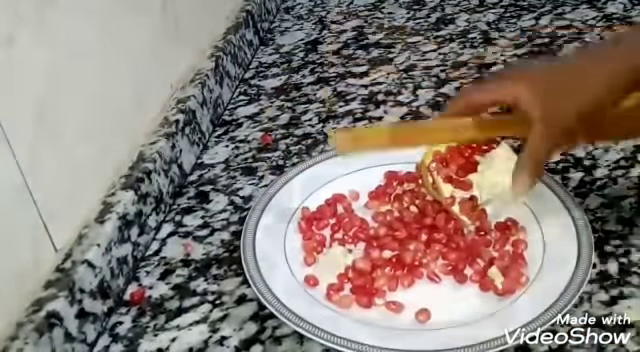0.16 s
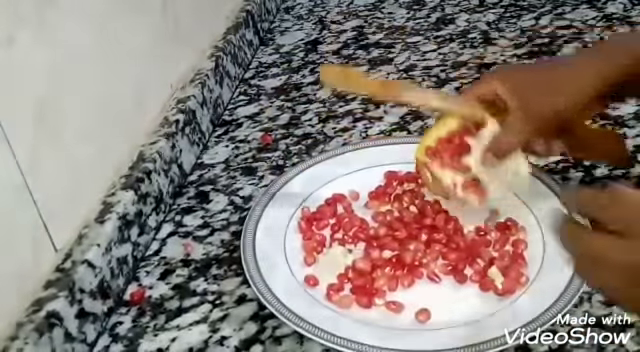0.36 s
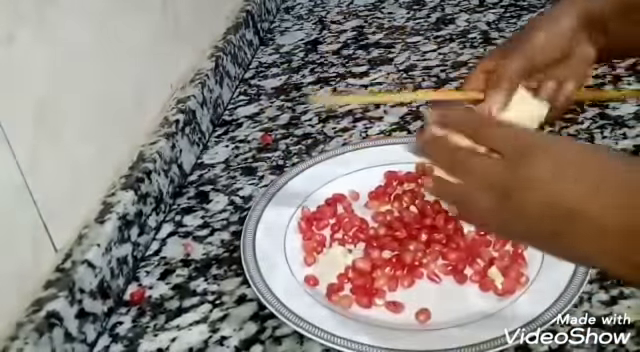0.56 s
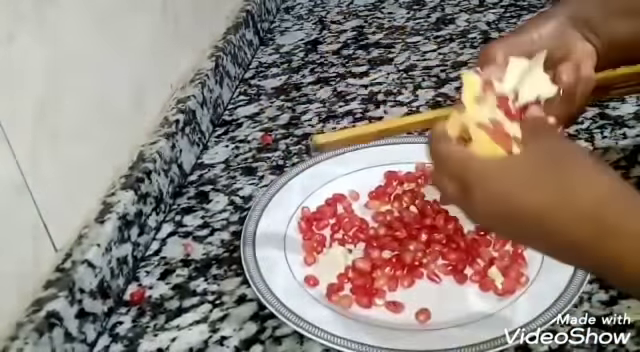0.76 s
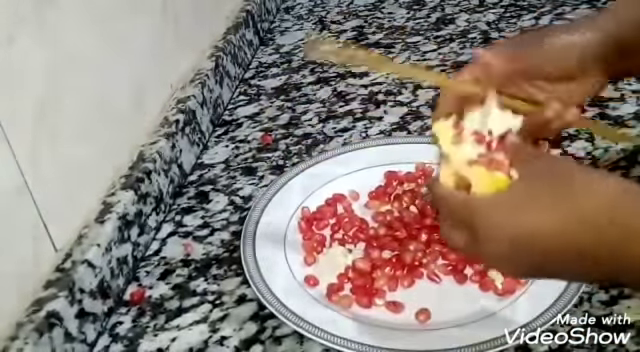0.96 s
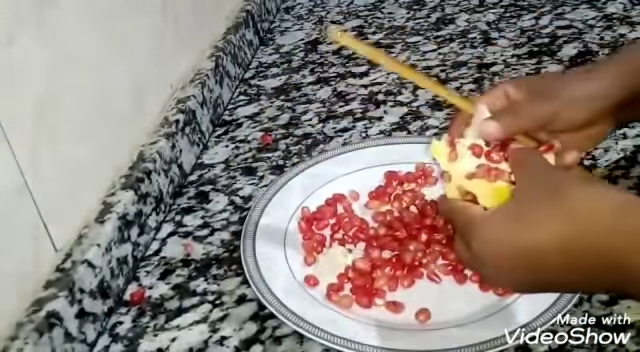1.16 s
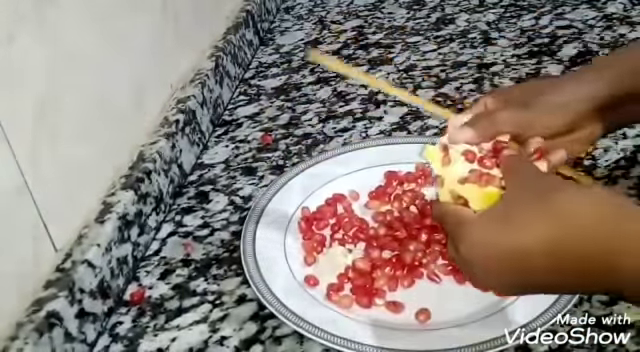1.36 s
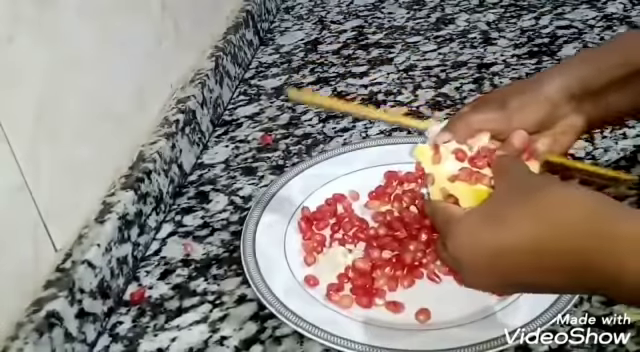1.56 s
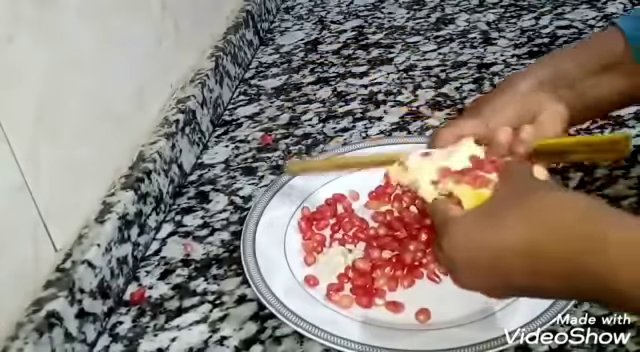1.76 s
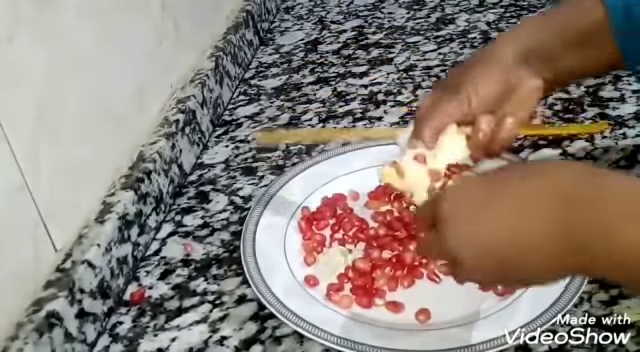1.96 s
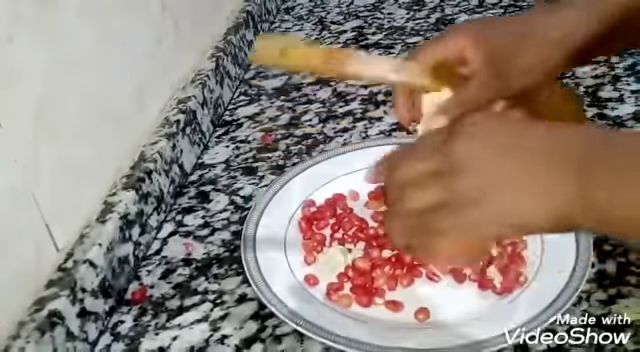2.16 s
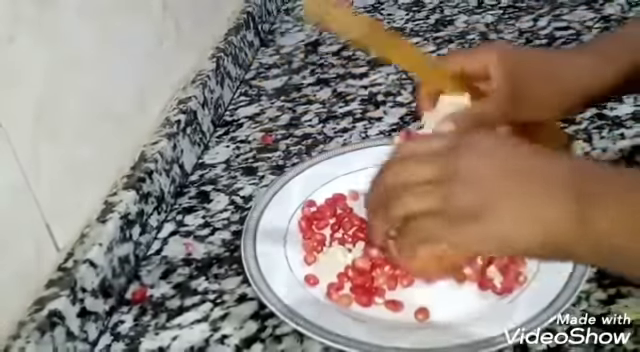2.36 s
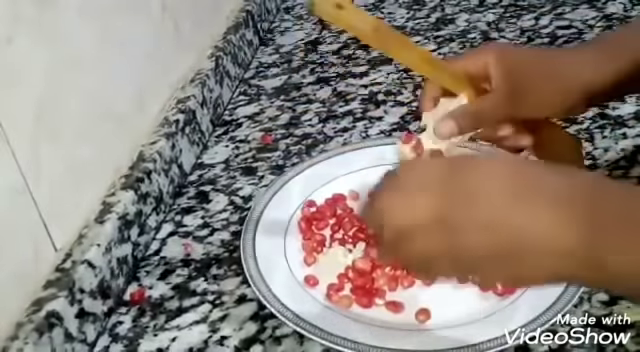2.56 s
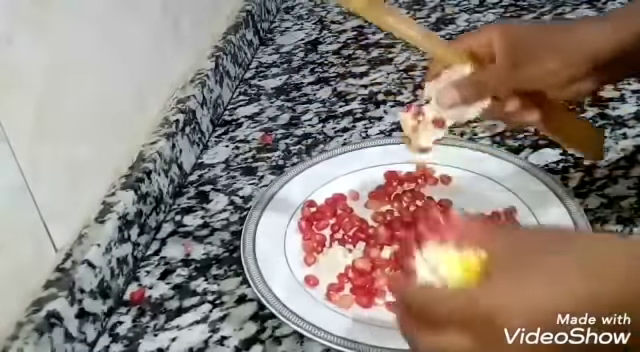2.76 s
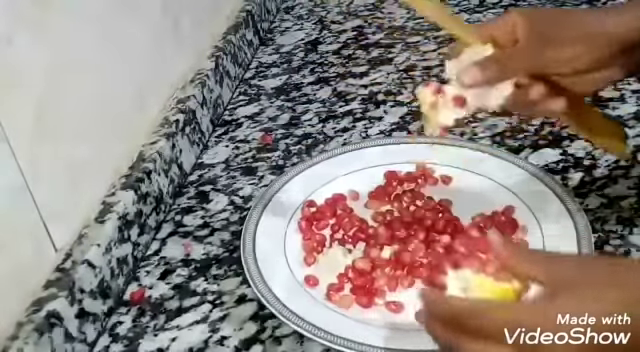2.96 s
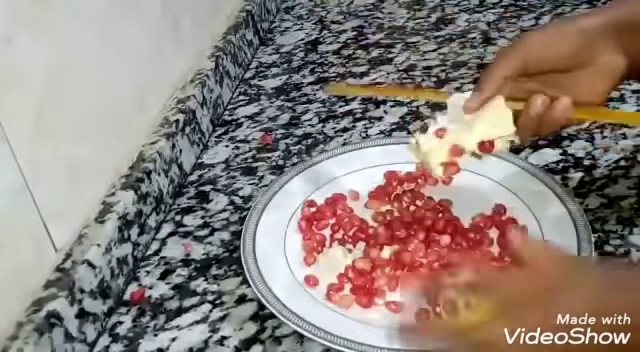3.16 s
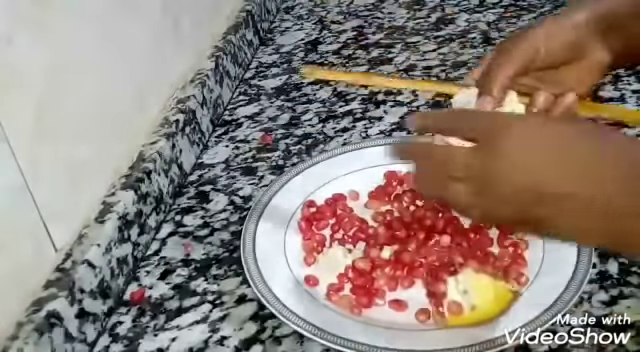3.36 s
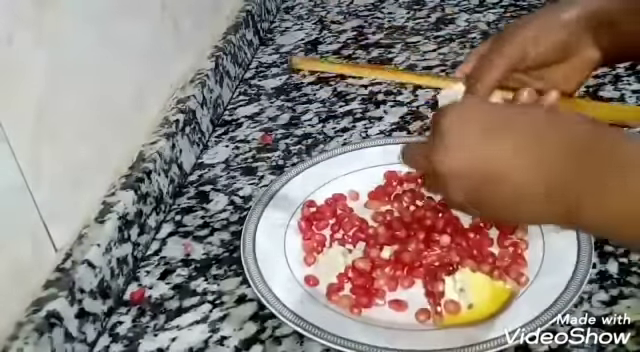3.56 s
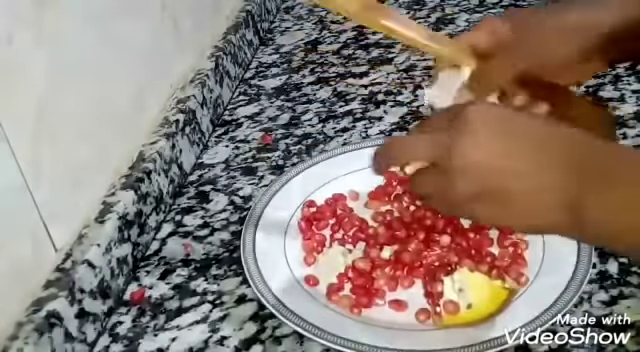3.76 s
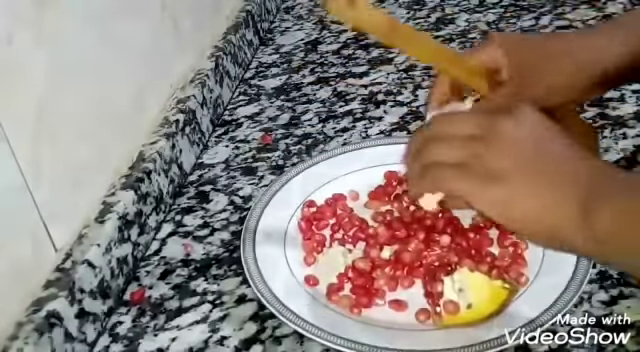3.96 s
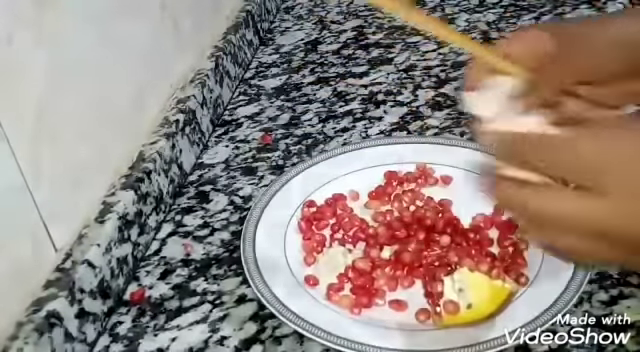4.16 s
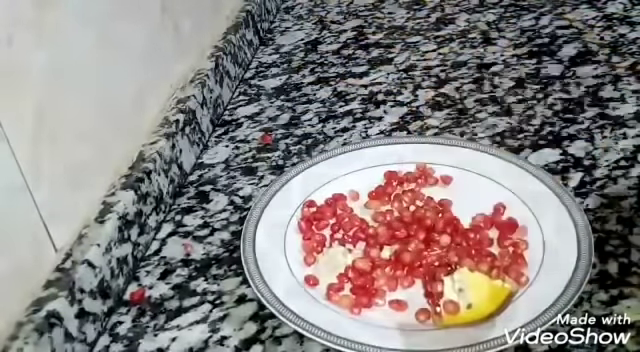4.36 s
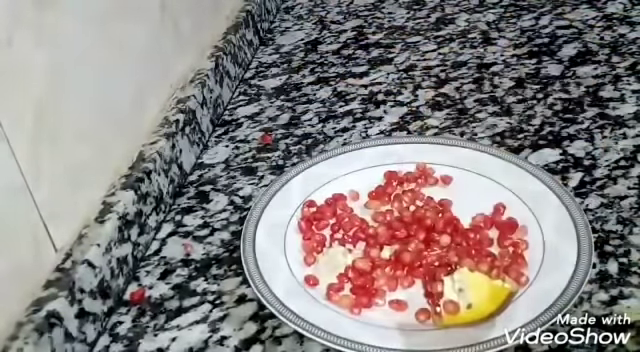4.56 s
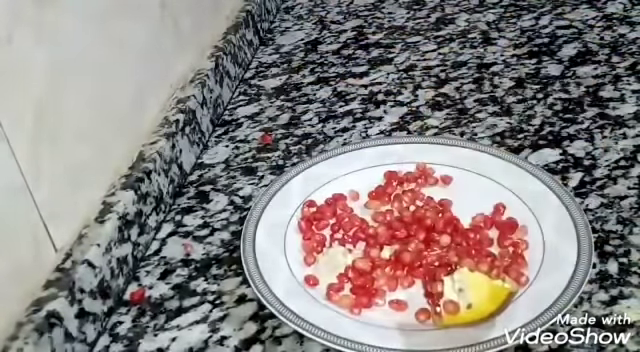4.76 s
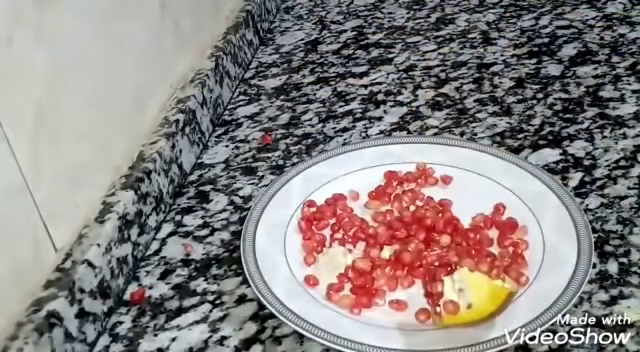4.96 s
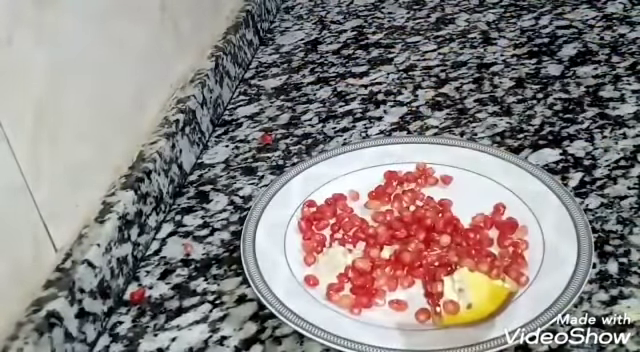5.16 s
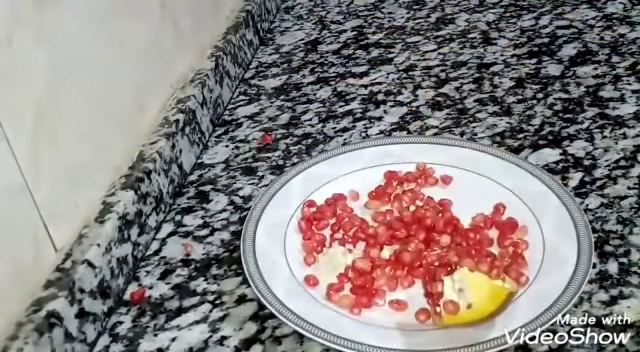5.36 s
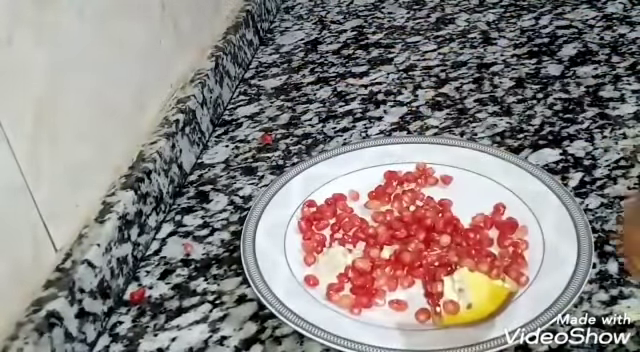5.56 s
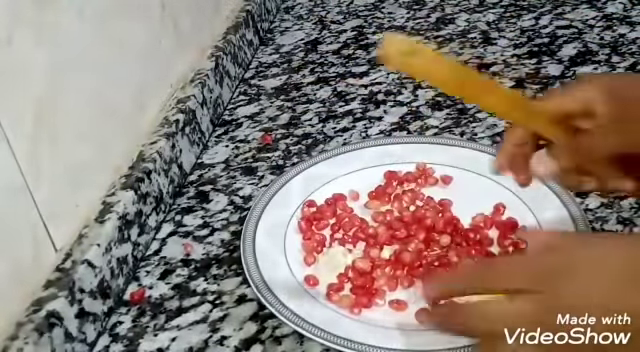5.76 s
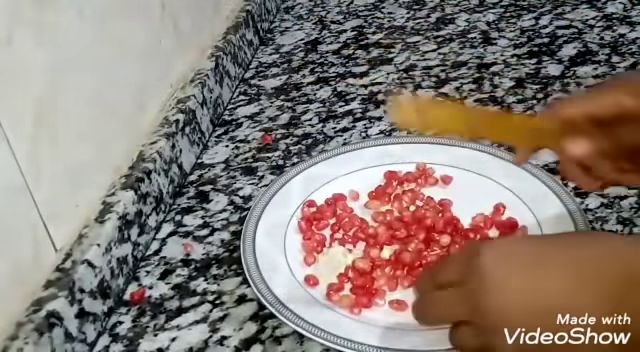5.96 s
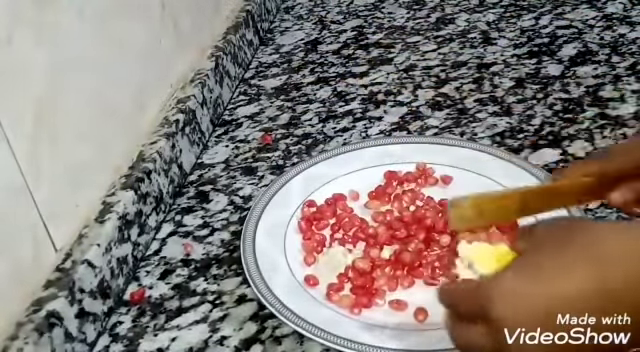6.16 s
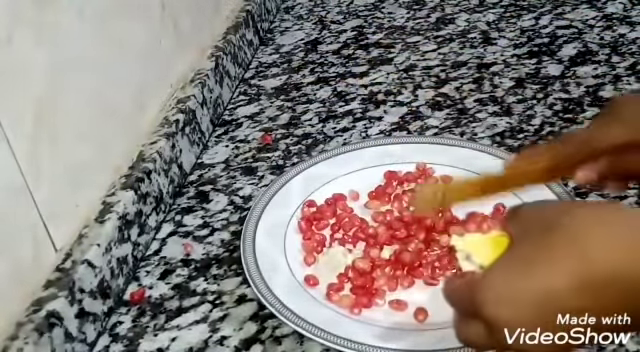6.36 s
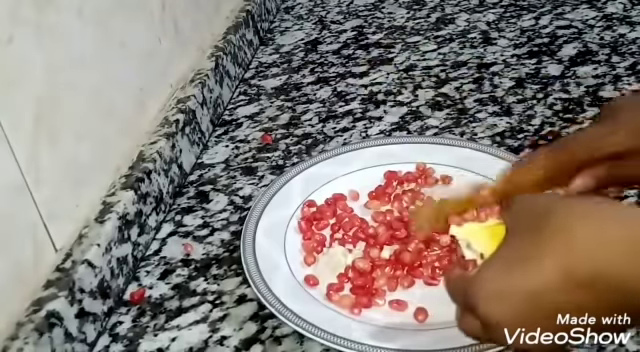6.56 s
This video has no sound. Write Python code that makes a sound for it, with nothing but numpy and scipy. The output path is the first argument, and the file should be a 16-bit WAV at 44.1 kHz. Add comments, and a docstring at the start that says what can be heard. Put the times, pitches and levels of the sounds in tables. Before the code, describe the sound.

Hands break up a pomegranate close to the microphone in a small kitchen with a short echo and a faint hiss. At about 0.3 seconds the rind cracks in a quick, crisp burst. A soft hollow tap follows at 0.6, and the fruit slides on a china plate with a faint creak. From 1.2 to 1.8 seconds the peel crackles and tears with tiny wet squishes, ending in a snap and a dull clunk from a wooden spoon. The spoon bumps and rubs lightly after 2 seconds, then knocks sharply on the plate near 2.5, making it ring briefly. A light tap and soft thuds come at 3.1, and two more snaps around 3.6. Then it is much quieter, with faint squishes and thuds near 4.9, light scraping around 5.8, and a last small crackle of rind at 6.5 seconds.

```python
"""Breaking up a pomegranate

Close to the microphone, hands break up a pomegranate over a china plate on a stone kitchen counter,
a wooden spoon held in one of them. The rind snaps and tears, wet pulp squishes, the spoon knocks and
sets the plate ringing, pieces thud down and slide, and fingers rub the peel. The small hard room
answers each sound over a quiet background with a narrow band of hiss."""
import sys
import numpy as np
from scipy import signal
from scipy.fft import rfft, irfft
from scipy.io import wavfile

SR = 44100
rng = np.random.default_rng(int(sys.argv[2]) if len(sys.argv) > 2 else 0)


def materialize(psi):
    """Save the field psi as 16-bit PCM at rate SR to the path in sys.argv[1].

    A 1-D psi becomes a single channel; in a 2-D psi each row is a channel.
    """
    bounded = np.clip(np.atleast_2d(psi).T, -1, 1)
    quanta = np.round(bounded * 32767).astype(np.int16)
    wavfile.write(sys.argv[1], SR, quanta)


N = 291833
TIME = np.arange(N) / SR

# Bending modes of the wooden spoon. Each row: pitch in Hz, level in dB, t60 in seconds.
SPOON_MODES = [(511, -14.5, 0.05), (592, -16, 0.035), (1392, -8.5, 0.033), (1673, 10, 0.021),
               (1976, -8, 0.025), (2706, -2.5, 0.06), (3870, -7, 0.015)]


def undb(db):
    """Decibels to gain."""
    return 10 ** (np.asarray(db) / 20)


def unit(x):
    """Scale to rms 1."""
    return x / np.sqrt(np.mean(x ** 2))


def add(track, s, sound):
    """Mix a sound into the track at s seconds."""
    i = int(s * SR)
    track[i:i + len(sound)] += sound[:N - i]


def convolve(x, response):
    """Filter x, keeping its length."""
    return signal.fftconvolve(x, response)[:len(x)]


def soften(x, bright_hz):
    """Low-pass: a softer contact passes less treble."""
    return signal.sosfilt(signal.butter(2, min(bright_hz, SR / 2 - 1), fs=SR, output="sos"), x)


def radiate(x, hz):
    """High-pass: a small object sends out almost no bass."""
    return signal.sosfilt(signal.butter(4, hz, "high", fs=SR, output="sos"), x)


def flutter(hz, size):
    """Random wavering up to the given rate, rms 1."""
    return unit(soften(rng.standard_normal(size), hz))


def swells(rows):
    """Smooth rises and falls of pressure from rows of middle in seconds, half-width in seconds, dB."""
    return sum(undb(db) * np.exp(-((TIME - s) / width) ** 2) for s, width, db in rows)


def impulse(points, size=2048):
    """Minimum-phase click with the given (Hz, dB) spectrum, peak 1."""
    hz, db = np.transpose(points)
    log_hz = np.log(np.fft.rfftfreq(size, 1 / SR) + 1)
    log_gain = np.log(undb(np.interp(log_hz, np.log(hz), db)))
    cepstrum = irfft(log_gain)
    cepstrum[1:size // 2] *= 2
    cepstrum[size // 2 + 1:] = 0
    click = irfft(np.exp(rfft(cepstrum)))
    return click / np.abs(click).max()


def ring(modes, size=22050):
    """Decaying sines of a struck object, from rows of Hz, dB, t60 in seconds."""
    t = np.arange(size) / SR
    hz, db, t60 = np.transpose(modes)[:, :, None]
    return np.sum(undb(db) * np.exp(-np.log(1000) * t / t60) * np.sin(2 * np.pi * hz * t), axis=0)


def pip(hz, rise_s, size):
    """A tone that swells smoothly and dies within a few rise times."""
    t = np.arange(size) / SR
    swell = (t / rise_s) ** 2 * np.exp(-t / rise_s)
    return swell / swell.max() * np.sin(2 * np.pi * hz * t)


def friction(colour, grains_per_s, spread_db):
    """Dense tiny slips of uneven size, rms 1."""
    slips = (rng.random(N) < grains_per_s / SR) * rng.choice([-1, 1], N)
    sizes = undb(spread_db * np.clip(rng.standard_normal(N), -2, 2))
    return unit(convolve(slips * sizes, impulse(colour)))


def background(floor_db=-74, swells_db=-83, hiss_db=-69, hiss_hz=1895, hiss_width_hz=150):
    """Low room tone with swells in its lower middle, and a narrow, wavering band of hiss."""
    # Steady room tone. Each row: frequency in Hz, relative density in dB.
    floor_colour = [(25, -27.5), (75, -4.5), (140, 0.5), (260, -0.5), (350, -13), (800, -7.5), (1250, -12),
                    (2400, -24), (3300, -19), (7000, -15), (9000, -29), (13500, -31), (15200, -23.5),
                    (16000, -26)]
    room_tone = unit(convolve(rng.standard_normal(N), impulse(floor_colour)))
    low_mids = unit(radiate(soften(soften(rng.standard_normal(N), 850), 850), 300))
    low_mids *= undb(4.5 * flutter(hz=4, size=N))
    band = signal.lfilter(*signal.iirpeak(hiss_hz, hiss_hz / hiss_width_hz, fs=SR),
                          rng.standard_normal(N))
    hiss = unit(signal.lfilter(*signal.iirpeak(hiss_hz, Q=3, fs=SR), band))
    waver = undb(1.5 * np.interp(TIME, np.linspace(0, TIME[-1], 70), rng.standard_normal(70)))
    return undb(floor_db) * room_tone + undb(swells_db) * low_mids + undb(hiss_db) * waver * hiss


def kitchen(x, low_t60=0.31, mid_t60=0.32, high_t60=0.26, build_s=0.00068, wall_s=0.028, size=16384):
    """Early reflections from counter and tiles melt into a short tail whose treble dies first."""
    t = np.arange(size) / SR
    walls = (rng.random(size) < 1 / 100) * rng.standard_normal(size) * 10
    echoes = rng.standard_normal(size) + undb(-3) * walls * np.exp(-t / wall_s)
    echoes *= 1 - np.exp(-t / build_s)
    low, below_top = (signal.sosfiltfilt(signal.butter(2, hz, fs=SR, output="sos"), echoes)
                      for hz in (1500, 7000))
    bands = ((low, low_t60), (below_top - low, mid_t60), (echoes - below_top, high_t60))
    response = sum(band * np.exp(-np.log(1000) * t / t60) for band, t60 in bands)
    return convolve(x, response / np.linalg.norm(response))


def scrape(touch_s=5.905, touch_db=-69):
    """Light, gritty friction in a few short pushes; one of them leaves a thin ring in the china."""
    # Faint scrapes on the plate. Each row: middle in seconds, half-width in seconds, level in dB.
    pushes = [(5.68, 0.049, -72.5), (5.76, 0.07, -73.5), (5.92, 0.014, -66), (5.98, .035, -97)]
    # Colour of the grit. Each row: frequency in Hz, level in dB.
    grit_colour = [(200, -24), (400, 4), (600, -8.5), (1200, -13.5), (2400, -2.5), (3000, -9), (3450, -2.5),
                   (4000, -12), (9000, -31.5)]
    out = swells(pushes) * friction(grit_colour, grains_per_s=920, spread_db=2.5)
    add(out, touch_s, undb(touch_db) * ring([(3530, 0.017, 0.29)]))
    return out


def rubs(fibre_db=-31, fibre_growth=.7):
    """Peel crackles under the fingers, single fibres give under the strain, and moving hands rustle."""
    # Fingers strain the peel. Each row: middle in seconds, half-width in seconds, level in dB.
    finger_rubs = [(.275, 0.04, -70), (.318, 0.0055, -38), (.354, 0.017, -39.5), (.8, 0.077, -71.5),
                   (1.187, 0.027, -62), (1.285, 0.048, -58), (1.542, 0.019, -55.5), (1.69, 0.021, -66),
                   (2.355, 0.015, -68.5), (3.09, 0.019, -59), (3.49, 0.032, -68), (3.595, 0.028, -58.5),
                   (4.905, 0.018, -69.5), (6.241, 0.032, -68), (6.589, 0.051, -59)]
    # Bright crackle of the peel. Each row: frequency in Hz, level in dB.
    peel_colour = [(200, -10), (700, -21), (2000, -2), (4000, -1), (6200, 7.5), (7500, 0.5), (9500, -15.5),
                   (15000, -32.5)]
    # The hands shift. Each row: middle in seconds, half-width in seconds, level in dB.
    hand_shifts = [(.32, 0.13, -68), (1.26, 0.025, -95), (2.78, .065, -70), (3.16, 0.052, -79.5),
                   (4.66, 0.074, -72.5), (4.92, 0.097, -66.5), (5.42, 0.1, -73), (5.74, 0.18, -73.5),
                   (6.27, 0.19, -73), (6.59, 0.017, -62.5)]
    # Dull rustle of the hands. Each row: frequency in Hz, level in dB.
    hand_colour = [(60, -14), (140, 11.5), (270, -2.5), (410, 7.5), (600, -10.5), (830, 1.5), (1200, -13.5),
                   (2400, -8.5), (3500, -22.5), (5000, -25.5), (12000, -55.5)]
    strain = swells(finger_rubs)
    peel = strain * friction(peel_colour, grains_per_s=2400, spread_db=4)
    fibres = strain ** fibre_growth * friction(peel_colour, grains_per_s=130, spread_db=1.5)
    hands = swells(hand_shifts) * friction(hand_colour, grains_per_s=700, spread_db=5)
    return peel + undb(fibre_db) * fibres + hands


def slide_pressure(ease_db_per_s, attack_s=0.014):
    """Each slide grips at once, holds, and eases off steadily."""
    # Fruit and hand slide over the plate. Each row: start in seconds, hold in seconds, level in dB.
    slides = [(0.586, 0.058, -59), (5.646, 0.12, -80.5)]
    pressure = np.zeros(N)
    for s, hold, db in slides:
        grip = np.clip((TIME - s) / attack_s, 0, 1)
        pressure += grip * undb(db - ease_db_per_s * np.maximum(TIME - s - hold, 0))
    return pressure


def drag(lift_s=.592, tap_db=-58, tick_db=-38, treble_hz=3200):
    """A hollow tap with a tick on top, and small slips that dull as the pressure eases."""
    # The hollow fruit as it lifts and slides. Each row: frequency in Hz, level in dB.
    hollow_colour = [(200, -29), (420, 6.5), (600, -20), (800, 4), (1050, -16), (1500, -21), (1850, 2),
                     (2300, 5), (2950, -7.5), (3250, -5.5), (3650, -8.5), (4100, 2.5), (4700, -22.5),
                     (9000, -39)]
    slips = friction(hollow_colour, grains_per_s=1200, spread_db=-4)
    out = soften(soften(slips, treble_hz), treble_hz) * slide_pressure(ease_db_per_s=34)
    out += radiate(slips, treble_hz) * slide_pressure(ease_db_per_s=100)
    tick = radiate(ring([(2110, 1, 0.027), (3140, 0.82, 0.0069)]), 2180)
    add(out, lift_s, undb(tap_db) * impulse(hollow_colour))
    add(out, lift_s, undb(tick_db) * soften(tick, treble_hz))
    return out


def groan(flutter_hz=130):
    """The fruit sticks and groans, rising in pitch as it lifts off the plate."""
    # Course of the groan. Each row: time in seconds, pitch in Hz, level in dB.
    course = [(0.643, 450, -91), (0.689, 594, -56.5), (0.719, 680.6, -59), (0.759, 818, -71),
              (.8, 809, -73), (0.852, 815, -67.5), (0.93, 736, -78.5), (1.02, 716, -100)]
    when, hz, db = np.transpose(course)
    phase = 2 * np.pi * np.cumsum(np.interp(TIME, when, hz)) / SR
    rough_tone = unit(flutter(flutter_hz, N) * np.sin(phase))
    return np.interp(TIME, when, undb(db), left=0, right=0) * rough_tone


def thuds(push_s=0.0031, t60=0.127, faint_db=-70, spread_db=5.5, low_hz=99, high_hz=513, size=22050):
    """Soft pushes, each ringing one low, damped resonance; fainter ones come at random."""
    # Fruit and hands land on the plate. Each row: start in seconds, level in dB, pitch in Hz.
    landings = [(0.292, -51, 121), (0.323, -60.5, 295), (0.405, -51.5, 130), (0.592, -43.5, 398),
                (0.599, -52, 126), (0.628, -52.5, 395), (0.648, -56, 120), (1.255, -54.5, 330),
                (1.753, -53, 351), (1.775, -53.5, 412), (2.452, -49.5, 164), (2.4561, -47, 310),
                (2.457, -39, 416), (3.097, -48, 127), (3.151, -52.5, 193), (3.201, -55, 134),
                (3.612, -56, 151), (4.86, -53.5, 173), (4.885, -63, 411), (4.927, -54, 156),
                (4.945, -59.5, 324), (5.72, -60.5, 392), (5.792, -59.5, 400), (6.141, -54, 106.4),
                (6.282, -54, 132)]
    out, t = np.zeros(N), np.arange(size) / SR
    envelope = (1 - np.exp(-t / push_s)) * np.exp(-np.log(1000) * t / t60)
    faint = [(when * TIME[-1],
              faint_db + spread_db * (2 * force - 1),
              low_hz * (high_hz / low_hz) ** pitch) for when, force, pitch in rng.random((44, 3))]
    for s, db, hz in landings + faint:
        add(out, s, undb(db) * envelope * np.sin(2 * np.pi * hz * t))
    return out


def squishes(rise_s=0.0003, low_ratio=0.68, low_db=-18, after_db=-11, after_s=0.006, size=1024):
    """Wet pulp gives with a rounded pip and a weaker, lower one; three smaller ones follow."""
    # Small, moist bursts of pulp. Each row: start in seconds, level in dB, pitch in Hz.
    bursts = [(0.231, -43.5, 6750), (0.2727, -48, 6300), (1.1625, -47, 6800), (1.1698, -48, 7000),
              (1.1835, -52.5, 6600), (2.2558, -52, 6700), (2.2605, -41.5, 7000), (2.345, -51, 6000),
              (3.468, -45.5, 6520), (3.731, -47, 6400), (4.821, -56, 5330), (4.915, -51, 6400)]
    out = np.zeros(N)
    for s, db, hz in bursts:
        squish = pip(hz, rise_s, size) + undb(low_db) * pip(hz * low_ratio, rise_s, size)
        add(out, s, undb(db) * squish)
        for late in rng.random(3):
            add(out, s + after_s * late, undb(db + after_db) * squish)
    return out


def spoon_rubs(bright_hz=620, low_cut_hz=330):
    """Sliding contact keeps the spoon's modes sounding, dull and rough."""
    # The spoon rubs along the fruit. Each row: middle in seconds, half-width in seconds, level in dB.
    strokes = [(2.062, 0.045, -60.5), (2.125, 0.016, -68), (2.37, 0.045, -62.5)]
    wood = soften(radiate(ring(SPOON_MODES), low_cut_hz), bright_hz)
    return swells(strokes) * unit(convolve(rng.standard_normal(N), wood))


def spoon_bumps(grip_detune=0.016, contact_s=0.0062, roughness=0.28, press_s=0.0009, low_cut_hz=330):
    """The spoon clunks on the soft fruit; the grip shifts its modes and the contact scuffs a little."""
    # Spoon and fruit touch. Each row: start in seconds, level in dB, contact brightness in Hz.
    touches = [(1.7502, -29.5, 1000), (1.914, -53.5, 3260), (2.012, -50, 2870), (2.023, -55, 1900),
               (2.043, -51, 3000), (2.063, -51.5, 2700), (2.1291, -39, 1710), (2.167, -55, 1700),
               (2.3435, -42.5, 1470), (3.0814, -42.5, 1900), (3.2237, -50.5, 1600)]
    out, t = np.zeros(N), np.arange(512) / SR
    for s, db, bright_hz in touches:
        modes = [(hz * (1 + grip_detune * rng.standard_normal()), mode_db, t60)
                 for hz, mode_db, t60 in SPOON_MODES]
        scuff = rng.standard_normal(len(t)) * t * np.exp(-t / contact_s)
        wood = ring(modes)
        wood *= 1 - np.exp(-TIME[:len(wood)] / press_s)
        clunk = wood + roughness * convolve(wood, scuff / np.linalg.norm(scuff))
        add(out, s, undb(db) * soften(soften(clunk, bright_hz), bright_hz))
    return radiate(out, low_cut_hz)


def knocks(ring_db=-23, wood_cut_hz=70, plate_cut_hz=380, chatter=0.74, chatter_hz=60, size=22050):
    """Wood clacks and the china rings on, each mode unevenly as the loaded plate chatters on stone."""
    # The spoon strikes the plate. Each row: start in seconds, level in dB, contact brightness in Hz,
    # offset of the ring in dB.
    strikes = [(2.4508, -27, 2520, 13), (2.4526, -30, 3000, 8), (2.4570, -11.5, 1360, -10.5),
               (2.4662, -27.5, 2000, 0), (2.4703, -26.5, 4800, 1.5), (2.478, -35, 3500, -8),
               (3.0850, -45.5, 3640, 6.5)]
    # Modes of the china plate. Each row: pitch in Hz, level in dB, t60 in seconds.
    plate_modes = [(488, -6, 0.12), (530.8, -4.5, 0.32), (584.8, -1, 0.2), (723, -3.5, 0.071),
                   (1040, -9, 0.22), (1215, 2.5, 0.13), (1485, -0.5, 0.15), (1707, -2.5, 0.11),
                   (2055, -2.5, 0.064), (2715, -3, 0.052), (2748, 6, 0.067), (3505, -9, 0.13),
                   (4410, -2, 0.1), (4770, 1, 0.095), (5340, -12, 0.41), (6310, 4, 0.18), (7494, 8, 0.15),
                   (8630, 1, 0.17)]
    # Dry clack of the wood. Each row: frequency in Hz, level in dB.
    wood_colour = [(80, -22), (170, -2), (300, -17.5), (530, -25), (700, 6.5), (850, -11), (1150, 0),
                   (1700, 11.5), (2300, -2.5), (2800, 2), (3600, -2), (6500, 3), (9000, -23), (14000, -34)]
    clacks, rings = np.zeros(N), np.zeros(N)
    clack = radiate(impulse(wood_colour), wood_cut_hz)
    partials = [ring([mode], size) for mode in plate_modes]
    for s, db, bright_hz, offset_db in strikes:
        china = sum(partial * (1 + chatter * flutter(chatter_hz, size)) for partial in partials)
        china = radiate(china, plate_cut_hz)
        add(clacks, s, undb(db) * soften(clack, bright_hz))
        add(rings, s, undb(db + ring_db + offset_db) * soften(china, bright_hz))
    return clacks, rings


def rind_piece(shell, share=.5, rise_cycles=0.79, low_hz=1500, high_hz=7000):
    """Every piece of rind has its own four woody resonances; they take a share of the shell's click."""
    woody = sum(unit(pip(hz, rise_cycles / hz, len(shell))) for hz in rng.uniform(low_hz, high_hz, 4))
    woody *= np.linalg.norm(shell) / np.linalg.norm(woody)
    return np.sqrt(1 - share) * shell + np.sqrt(share) * woody


def tearing(shell_db, size, splinter=0.55, fibres_per_s=3000, stragglers_per_s=260, straggler_s=.014):
    """A first break, then fibres tear, longer the more shell it takes; the last give one by one."""
    t = np.arange(size) / SR
    tear_ms = 2 * undb(shell_db) ** .6
    fibres = (rng.random(size) < fibres_per_s / SR) * rng.standard_normal(size)
    fibres *= np.sqrt(t) * np.exp(-t * 1000 / tear_ms)
    tear = splinter * tear_ms * fibres / np.linalg.norm(fibres)
    tear[0] = 1
    tear /= np.sqrt(np.linalg.norm(tear))  # a slow tear has a weaker first break
    stragglers = (rng.random(size) < stragglers_per_s / SR) * rng.uniform(-1.2, 1, size)
    return tear + undb(-13 + shell_db / 2) * stragglers * np.exp(-t / straggler_s)


def cracks(rise_cycles=0.78, edge_hz=10000, top_hz=15000, snap_room_db=-6, shell_room_db=-1, size=16384):
    """Rind breaks with a pitched snap and a broad click; the room's share shifts as the fruit turns."""
    # Breaks in the rind. Each row: start in seconds, level in dB, snap pitch in Hz, then the gains of
    # the shell and of the crisp edge in dB.
    breaks = [(0.3055, -24.5, 6100, -9, -9.5), (0.3124, -25, 6200, -6.5, -7.5),
              (0.317, -26.5, 6160, -18.5, -19.5), (.323, -29, 5940, -14.5, -9),
              (0.3330, -13, 6160, -10, -8), (0.334, -31.5, 1980, -3.5, -14),
              (0.337, -25, 6030, -1.5, -20.5), (0.3415, -18, 6300, -24.5, -25), (0.3485, -30, 6000, -3, -7),
              (0.3522, -30, 6500, -3, -11.5), (0.3574, -30, 6300, -5, -13), (0.3621, -27, 6260, -5.5, -13),
              (1.235, -34.5, 6600, -10, 5), (1.2426, -45, 6330, -16, -14), (1.252, -34.5, 6000, -2, 0),
              (1.2712, -39, 6500, 2, -6), (1.2767, -34.5, 6500, 1.5, 0), (1.2891, -43, 5900, 6, -8),
              (1.318, -37, 2140, 5, -7), (1.3272, -39.5, 6200, -7.5, -17), (1.3317, -40, 2350, -8, -6),
              (1.496, -40, 7000, -16, -11), (1.5445, -31.5, 5680, 10, -38), (1.5474, -29, 5520, 5, -26),
              (1.6575, -35, 5600, -4, -16.5), (1.7033, -38.5, 6600, -5, -18), (1.75, -24, 5240, 4, -9),
              (1.7519, -24, 5800, -2, -22), (1.756, -31, 5300, -7, -24), (1.7722, -28.5, 6400, 6.5, -2),
              (1.7734, -45, 6000, 9, -16), (3.5369, -25.5, 5930, -7.5, -22), (3.6109, -24, 6600, -13, -4),
              (3.6127, -32.5, 5900, 3, -23.5), (6.5421, -40, 6450, -20, 0), (6.5692, -43, 6300, 5, -14),
              (6.5741, -40.5, 6030, 5, -3), (6.5981, -35.5, 2220, 5.5, -10)]
    # The shell of rind as it cracks. Each row: frequency in Hz, level in dB.
    shell_colour = [(100, -31.5), (280, -21.5), (460, 3), (700, -12.5), (1000, 1), (2000, 1.5), (3500, 4.5),
                    (5500, 0.5), (7500, 5.5), (10000, -10), (12500, -28), (15500, -30)]
    # The fruit as it comes apart. Each row: time in seconds, gain in dB of the sound the hands turn
    # away into the room, lowest pitch of the loose shell in Hz.
    fruit_states = [(0.331, -14, 1500), (1.271, -0.5, 900), (1.55, -1.5, 504), (1.75, -1.5, 206.7),
                    (3.54, 7.5, 1480), (3.61, 5, 441.5), (6.55, 2, 252)]
    when, turned_db, lowest_hz = np.transpose(fruit_states)
    out = np.zeros(N)
    shell = np.pad(impulse(shell_colour), (0, size))[:size]
    edge = radiate(soften(signal.unit_impulse(size) + 1e-18, top_hz), edge_hz)
    for s, db, hz, shell_db, edge_db in breaks:
        tear = tearing(shell_db, size)
        snap = pip(hz, rise_cycles / hz, size) + undb(edge_db) * edge
        body = undb(shell_db) * radiate(rind_piece(shell) + 1e-18, np.interp(s, when, lowest_hz))
        send = undb(snap_room_db) * snap + undb(shell_room_db) * body
        send *= undb(np.interp(s, when, turned_db)) * np.linalg.norm(tear)
        add(out, s, undb(db) * (convolve(tear, snap + body) + kitchen(send)))
    return out


def scene(clack_room_db=-1, plate_room_db=-6, spoon_room_db=-3, soft_room_db=-5, pulp_room_db=-8):
    """All sources close to one microphone, each with its share of the room."""
    clacks, plate = knocks()
    spoon = spoon_bumps() + spoon_rubs()
    soft = thuds() + drag() + groan() + rubs() + scrape()
    pulp = squishes()
    send = undb(clack_room_db) * clacks + undb(plate_room_db) * plate
    send += undb(spoon_room_db) * spoon + undb(soft_room_db) * soft + undb(pulp_room_db) * pulp
    return (cracks() + clacks + plate + spoon + soft + pulp + kitchen(send) + background())[None]


def record(dry):
    """The phone cuts the top steeply above 16.1 kHz."""
    return signal.sosfilt(signal.ellip(10, .2, 70, 16100, fs=SR, output="sos"), dry)


dry = scene()
out = record(dry)
materialize(out)
```